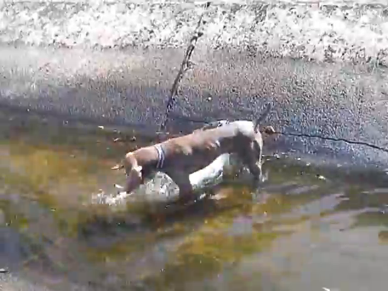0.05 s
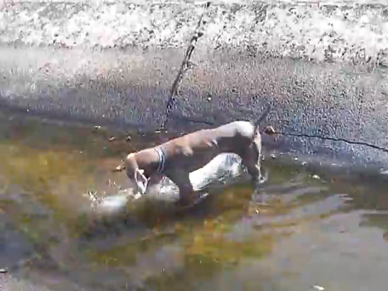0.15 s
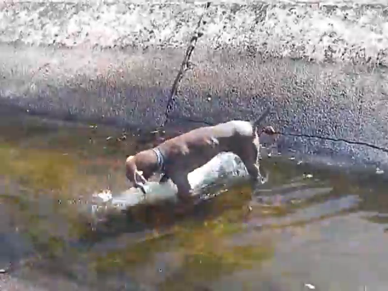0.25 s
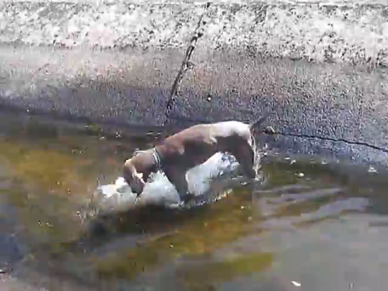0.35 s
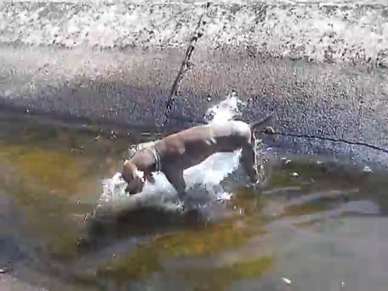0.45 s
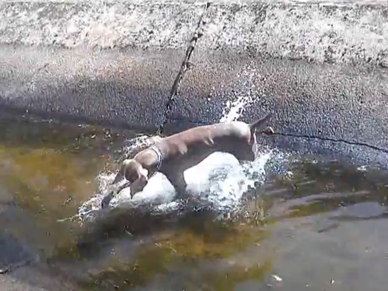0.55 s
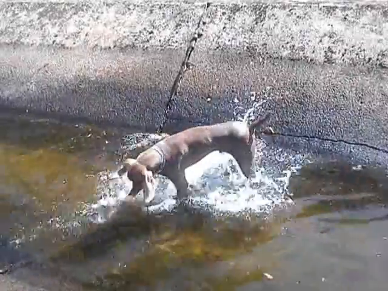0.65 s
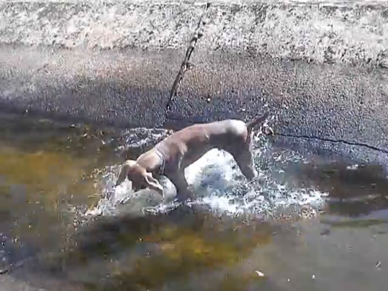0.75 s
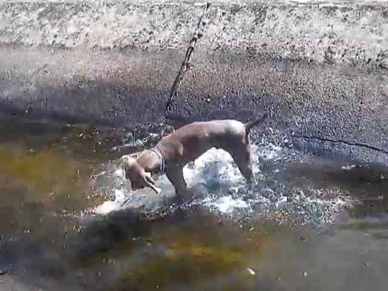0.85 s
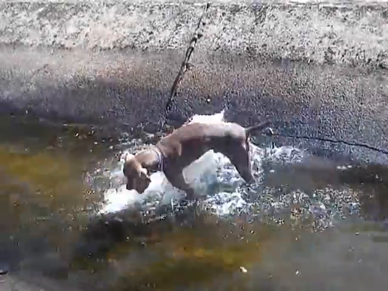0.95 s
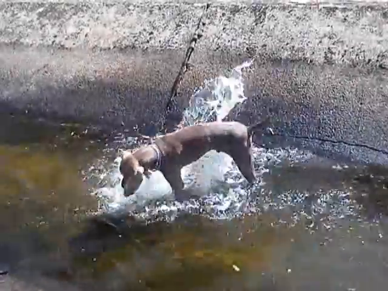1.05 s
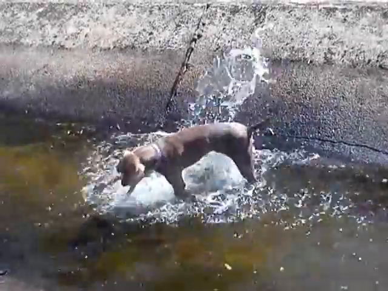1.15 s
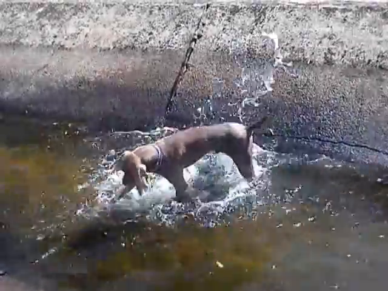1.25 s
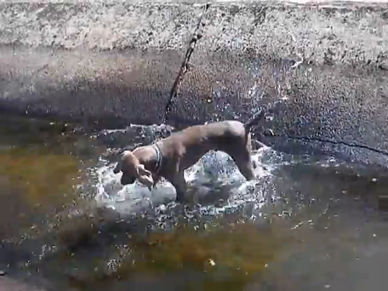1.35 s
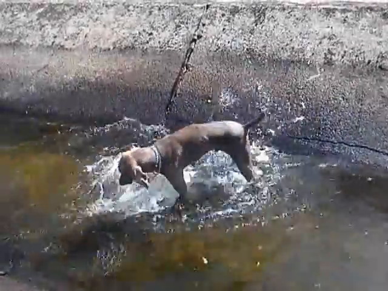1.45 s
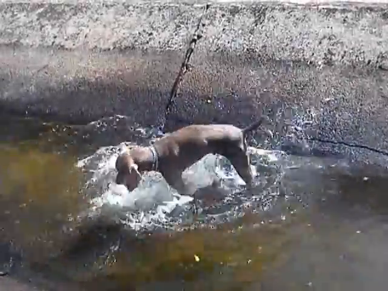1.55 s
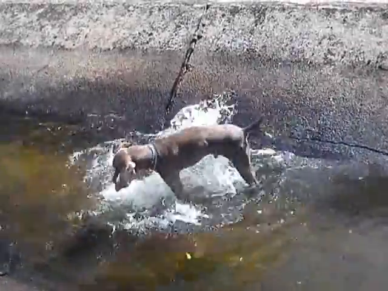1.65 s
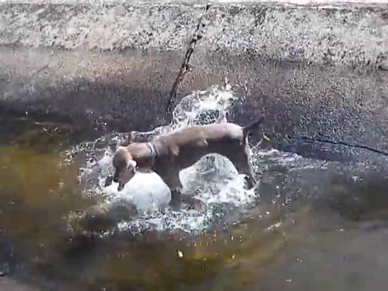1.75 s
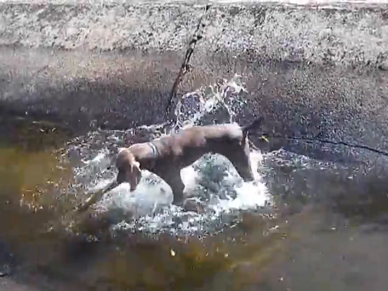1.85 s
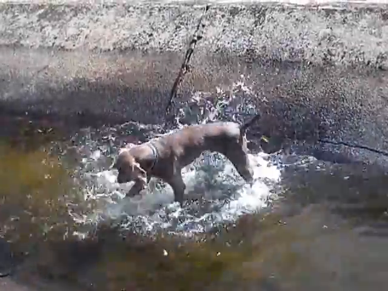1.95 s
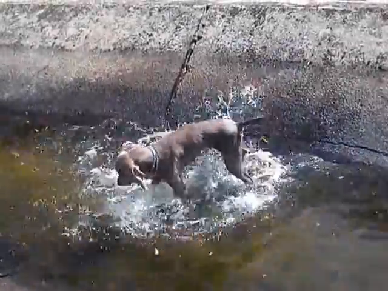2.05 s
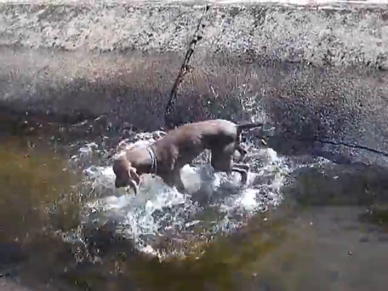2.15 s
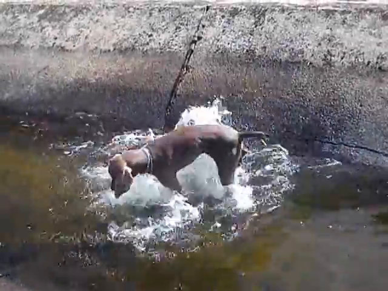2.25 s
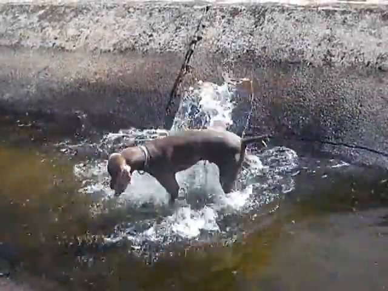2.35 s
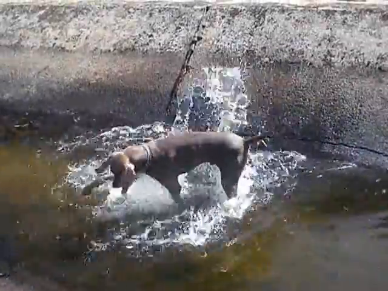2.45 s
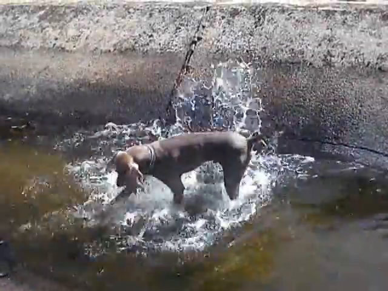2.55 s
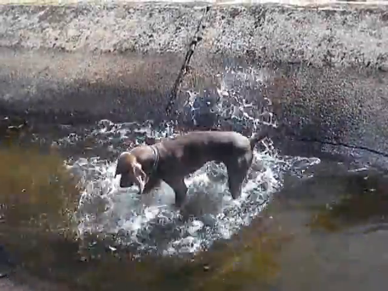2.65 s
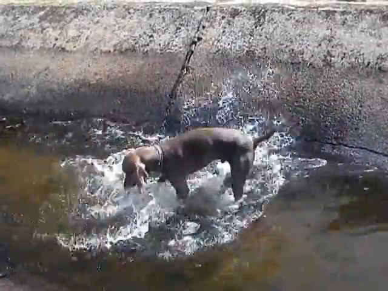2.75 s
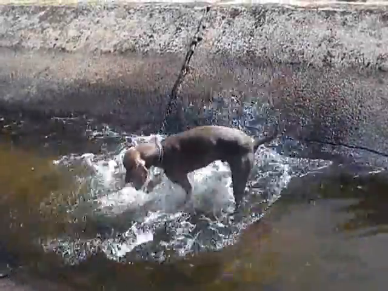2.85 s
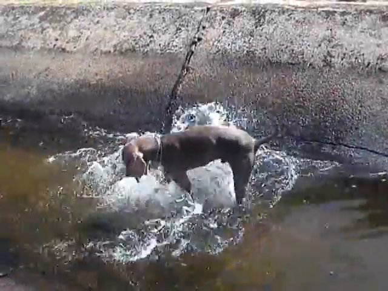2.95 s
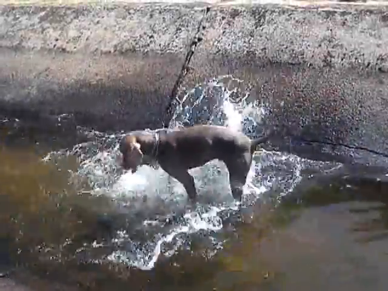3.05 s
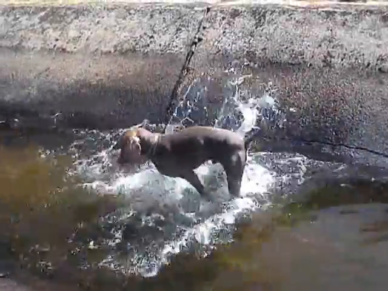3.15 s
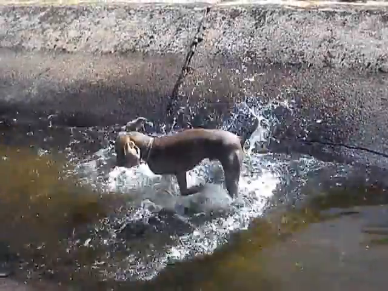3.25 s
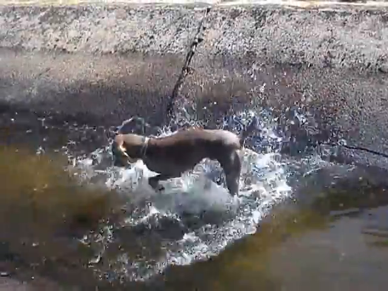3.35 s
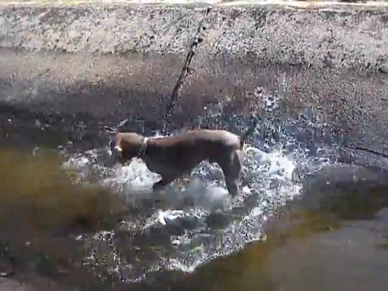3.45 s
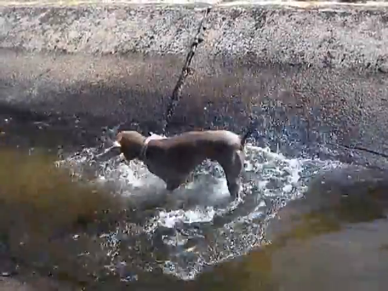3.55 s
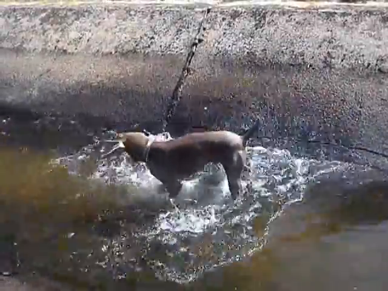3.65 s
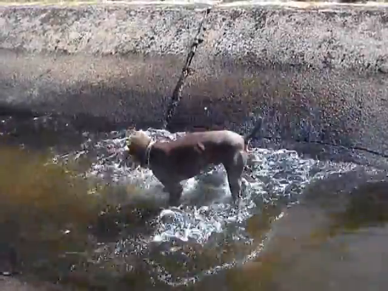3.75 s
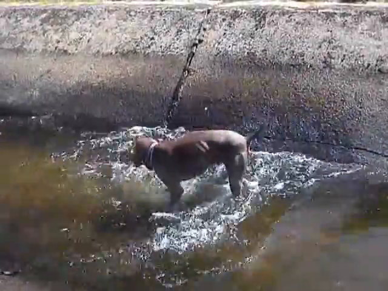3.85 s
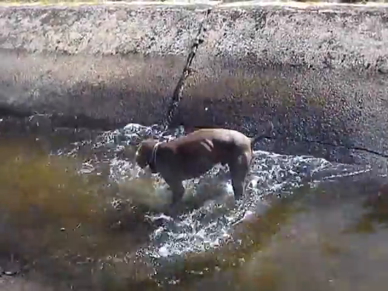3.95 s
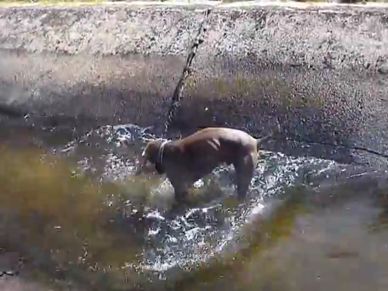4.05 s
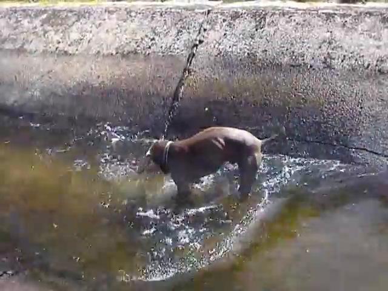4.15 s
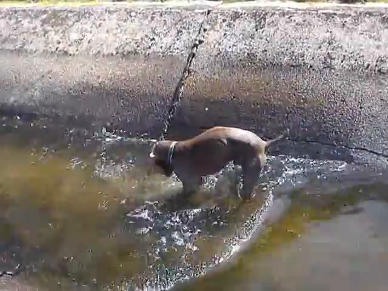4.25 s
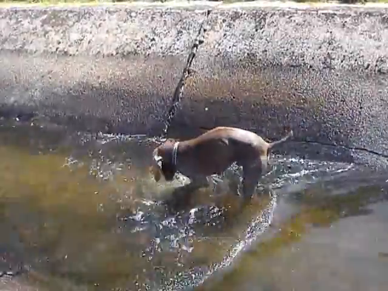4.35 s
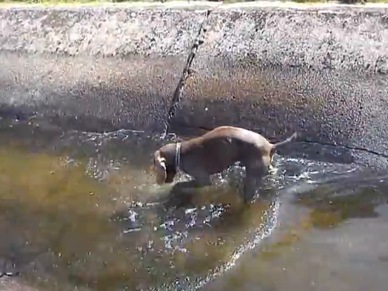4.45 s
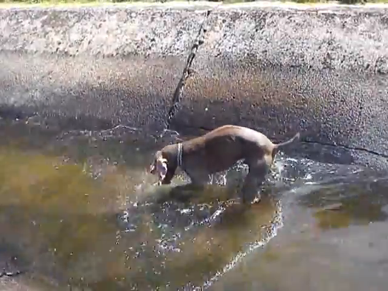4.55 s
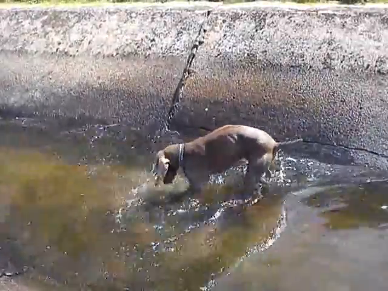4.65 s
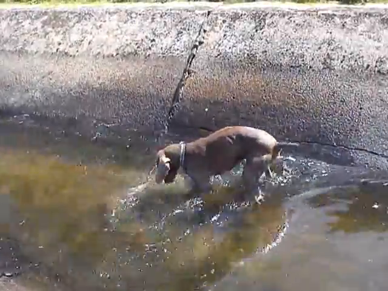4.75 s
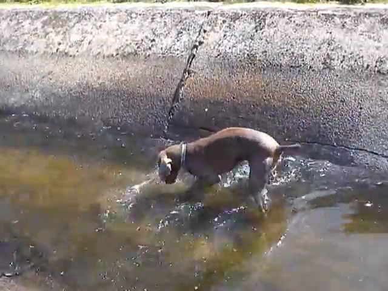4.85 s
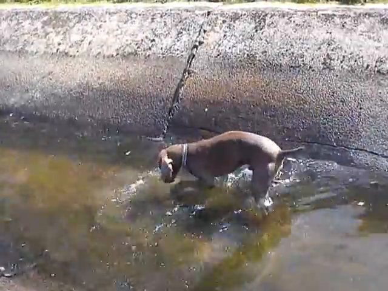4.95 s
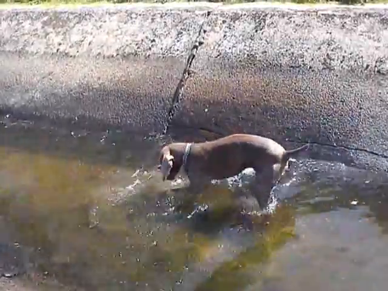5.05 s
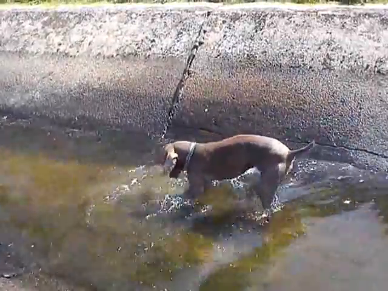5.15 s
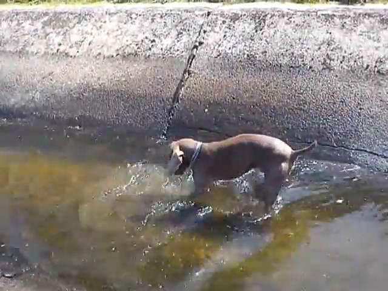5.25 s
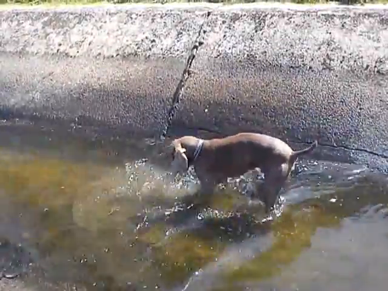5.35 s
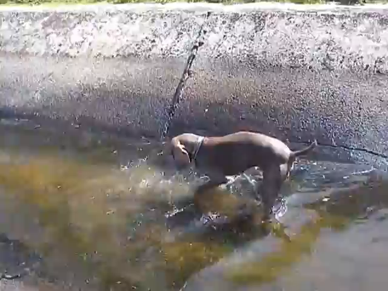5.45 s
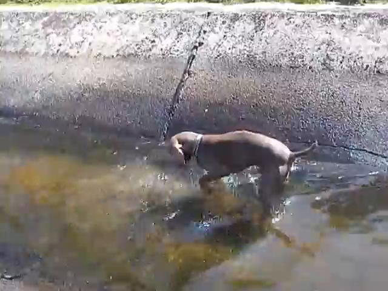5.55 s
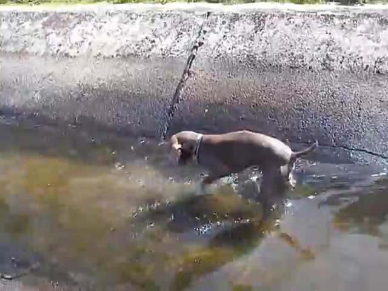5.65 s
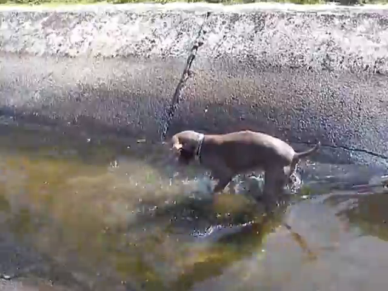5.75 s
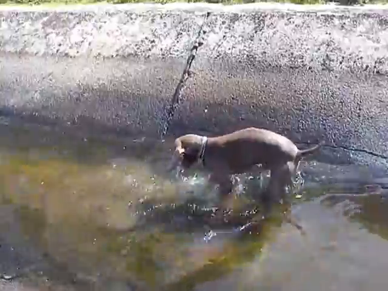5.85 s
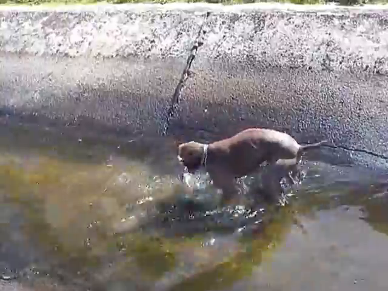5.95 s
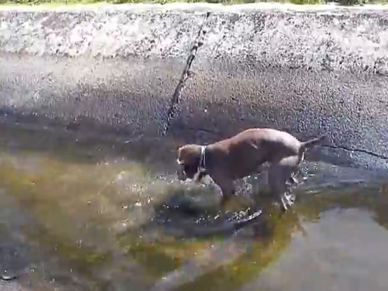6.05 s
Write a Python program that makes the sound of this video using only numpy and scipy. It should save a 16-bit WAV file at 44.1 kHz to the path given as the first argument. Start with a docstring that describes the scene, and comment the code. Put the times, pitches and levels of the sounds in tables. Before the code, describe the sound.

A light trickle and soft outdoor rush open the sound, until at about 0.2 s a sharp wet slap begins a dog's digging in shallow water. Until about 3.9 s, irregular strokes follow several times a second, each a burst of hissing, spattering spray over low bubbly churn. Hard slaps with short, bright bubble pops stand out, notably around 1.1, 1.7, 2.4, 2.7, 2.9, 3.1 and 3.6 s, while low air-pocket gulps glug among them. Falling drops fill the gaps. From 4 s it becomes much quieter: sparse drips, then wading sloshes from 4.2 s, a strong plop near 4.75 s, hollow gulps around 5.4 s, and busier splashes from 5.6 s to a final double gulp just after 6 s. Concrete banks add a weak, short echo. The mono microphone is narrow-band, with little above 5 kHz, squashing and clipping the loudest slaps.

```python
"""A dog digs with its forepaws in the shallow water of a concrete channel, then slows to a few wading steps.
Thrown water falls back as drop impacts and ringing bubbles, thinning into separate drips between strokes.
Legs churn larger bubbles into a low wash; slaps make spattering noise and strong bubbles; air pockets gulp.
The banks return a weak echo beside a steady outdoor rush.
The microphone is narrow-band, and its overload compresses and clips the sharpest slaps."""
import sys
import numpy as np
from scipy import signal
from scipy.fft import rfft, irfft
from scipy.io import wavfile
from scipy.ndimage import uniform_filter1d, minimum_filter1d

SR = 44100
rng = np.random.default_rng(int(sys.argv[2]) if len(sys.argv) > 2 else 0)


def persist_wave(psi):
    """Save psi, clipped to +-1, as 16-bit WAV."""
    counts = np.round(np.clip(psi, -1, 1) * 32767).astype(np.int16)
    wavfile.write(sys.argv[1], SR, np.atleast_2d(counts).T)


N = 269010
TIME = np.arange(N) / SR

# Paw strokes through the water, digging until 3.9 s and then wading:
# start_s, length_s, spray_level_db, churn_level_db (relative levels)
PAW_STROKES = [(0.241, 0.066, -18.5, -27.5), (0.349, 0.089, -14.5, -27.5), (0.537, 0.02, -21, -31.5),
               (0.615, 0.018, -13, -23), (0.765, 0.16, -14.5, -31), (0.994, 0.084, -17.5, -34),
               (1.205, 0.24, -15.5, -25), (1.639, 0.029, -10, -20.5), (1.698, 0.056, -16.5, -20),
               (1.828, 0.032, -14, -23.5), (1.884, 0.13, -13.5, -22.5), (2.065, 0.071, -16.5, -33.5),
               (2.337, 0.013, -18.5, -20), (2.466, 0.072, -22, -23), (2.583, 0.18, -16, -26.5),
               (2.83, 0.088, -17, -51), (2.985, 0.034, -15.5, -31.5), (3.144, 0.084, -14, -29.5),
               (3.234, 0.14, -15, -21.5), (3.433, 0.032, -17.5, -21.5), (3.515, 0.14, -13.5, -32.5),
               (3.724, .09, -22, -26), (4.207, 0.095, -26, -48.5), (4.595, 0.079, -24, -37),
               (4.702, 0.043, -21, -22.5), (4.912, 0.09, -28, -28.5), (5.068, 0.038, -27.5, -30.5),
               (5.317, .12, -23.5, -25.5), (5.556, 0.041, -24, -32), (5.638, 0.04, -21, -29),
               (5.746, 0.045, -21.5, -31.5), (5.817, 0.034, -18.5, -25), (5.916, 0.096, -19.5, -31.5),
               (6.01, 0.019, -32, -24)]
# Drops still coming down between strokes: time_s, level_db (relative)
LINGERING_FALL = [(0, -24), (.17, -24.5), (.33, -21), (.69, -20), (.98, -15.5), (1.8, -15.5), (2.05, -12),
                  (2.22, -15.5), (2.93, -16.5), (3.11, -20), (3.42, -13.5), (3.7, -21.5), (3.91, -22.5),
                  (4.09, -33), (4.55, -31), (4.88, -29), (5.0, -25), (5.25, -25), (5.52, -30), (6.1, -30.5)]
# Loudest hits of paws and lumps of water on the surface:
# start_s, level_db (relative), bubble_pitch_hz (at onset), spatter_db (added to level_db)
SURFACE_SLAPS = [(.2, 10, 2040, -17.5), (0.347, 2, 2236, -10.5), (0.378, -2, 1670, -22),
                 (.495, 4, 1920, -18), (0.626, -4, 2280, -15), (0.728, -2.5, 1910, -20.5),
                 (.805, -1.5, 2200, -13.5), (1.05, -1.5, 2056, -5.5), (1.079, 3, 3010, -12.5),
                 (1.13, 7, 2243, -12.5), (1.194, 0, 1480, -21), (1.215, -7, 1580, -9),
                 (1.253, -5, 1790, -6.5), (1.28, -0.5, 1890, -29), (1.473, -1.5, 1750, -17),
                 (1.59, -3, 2120, -7.5), (1.662, 0, 2800, -8), (1.693, 6, 2660, -10.5),
                 (1.714, 3.5, 1940, -18), (1.755, -2.5, 1700, -8), (1.823, -11, 1970, -10),
                 (1.893, 2, 2213, -10), (1.962, 3, 2310, -11.5), (2.343, -1.5, 1220, -23),
                 (2.364, 7, 2170, -14), (2.442, -3.5, 1455, -10), (2.491, 0.5, 2562, -12),
                 (2.6, 1, 1960, -33), (2.699, 7, 1956, -14), (2.86, 0, 3230, -22), (2.907, 7.5, 3060, -24),
                 (2.962, 0, 2350, -16), (3.143, 7.5, 2305, -10), (3.293, -3, 2420, -4),
                 (3.391, 0.5, 1550, -20), (3.605, 7, 3230, -23), (3.747, -8.5, 1207, -15),
                 (3.833, -3.5, 1880, -33), (3.905, -11, 2800, -7), (3.927, -4, 1600, -23),
                 (4.225, -7.5, 1680, -27), (4.306, -4.5, 2260, -34), (4.368, -12, 1200, -11.5),
                 (4.616, -5, 1227, -27), (4.739, -3, 1175, -19), (4.756, 8.5, 1840, -17),
                 (4.79, -13, 954, -12), (4.933, -4, 1340, -21.5), (4.964, -11.5, 835, -17),
                 (5.163, -14, 2200, -2.5), (5.286, -4, 1380, -14), (5.331, -8.5, 1174, -13),
                 (5.341, -6.5, 1510, -23), (5.366, -7, 1410, -7.5), (5.44, -11.5, 1055, -10),
                 (5.651, -8, 3340, -6.5), (5.665, -3.5, 2270, -19), (5.777, 3, 1413, -10),
                 (5.819, -5, 2330, -23), (5.844, 2.5, 2960, -31), (5.929, -5.5, 2200, -10),
                 (5.97, 0, 2720, -17)]
# Air pockets pulled under by a paw:
# start_s, level_db (peak), pitch_hz (at onset), glide_length_s, glide_octaves (over that length)
AIR_POCKETS = [(.33, -18.5, 111, 0.019, 0.15), (0.438, -9, 233, 0.039, -1.3),
               (0.635, -19, 327, 0.017, 0.28), (.745, -23.5, 169, 0.043, -0.69),
               (1.32, -20.5, 164, 0.019, -.3), (1.836, -18, 218, 0.017, -0.75),
               (1.964, -9.5, 217, 0.021, 0.23), (1.988, -20.5, 150, .05, -.5),
               (2.188, -22.5, 219, 0.066, 0.32), (1.661, -16.5, 623, .025, 0.24),
               (2.348, -12, 622, 0.021, 0.19), (2.5, -21.5, 215.5, 0.056, 0.99),
               (2.797, -21.5, 133, 0.016, 0.19), (2.984, -13.5, 659, 0.041, 0.39),
               (3.319, -7.5, 268, .012, .14), (3.517, -19.5, 217, 0.033, 0), (3.566, -16, 202, 0.095, 0.27),
               (3.611, -15.5, 224, 0.096, .04), (4.691, -22, 293, 0.044, 0.74),
               (4.722, -13, 879, 0.021, 0.5), (4.737, -15.5, 476, 0.027, 0.22),
               (4.837, -19.5, 189, 0.048, -0.31), (4.907, -22, 199, 0.016, -0.19),
               (5.057, -23, 255, .034, 0.0026), (5.365, -7.5, 191, 0.033, -.3),
               (5.409, -6.5, 170, 0.025, -0.53), (5.595, -24.5, 847, 0.042, -0.078),
               (5.752, -17.5, 315, 0.05, -0.2), (5.823, -22.5, 291, 0.028, -0.44),
               (6.029, -5.5, 205, 0.015, 0.81), (6.051, -7, 194, 0.034, -0.46)]
# Spectrum of dense falling water: frequency_hz, gain_db
SPRAY_SPECTRUM = [(300, -28), (850, -12.5), (1100, -4), (1500, 1), (2000, 1), (2500, 0.5), (3300, -4.5),
                  (4600, -3.5)]
# Spectrum of single drips: frequency_hz, gain_db
DRIP_SPECTRUM = [(800, -5), (1200, 1), (1600, 1), (2300, 2), (2800, -1), (3400, -7)]
# Spectrum of water stirred by the legs: frequency_hz, gain_db
CHURN_SPECTRUM = [(30, -16), (90, -7.5), (170, -8.5), (280, -0.5), (400, -1), (700, 0), (1000, -3.5),
                  (1800, -22)]
# Spectrum of the outdoor background: frequency_hz, gain_db
AIR_SPECTRUM = [(25, -17), (70, -11), (120, -1), (180, 0.5), (260, -3.5), (400, -23), (1200, -12),
                (2400, -8.5), (3300, -9.5), (4600, -8.5), (7000, -26.5)]
# Microphone response: frequency_hz, gain_db
MIC_RESPONSE = [(20, -7), (70, 4.5), (2350, 0), (2600, -3), (3000, -2.5), (3300, 3.5), (3480, 0.5),
                (3950, -14.5), (4150, -15.5), (4600, -14), (4750, -20), (5000, -32), (5300, -106)]
# Spectra of the remaining noises: frequency_hz, gain_db
IMPACT_SPECTRUM = [(300, -16.5), (900, 0.0), (5000, -5.5), (8000, -33)]
SLOSH_SPECTRUM = [(400, -13.0), (1000, -2.0), (3500, -1.0), (6000, -15.5)]
SPATTER_SPECTRUM = [(150, -4.5), (600, -4.5), (1300, 11), (2200, 12.5), (3300, 12.5), (4600, 3.5), (8000, -12.0)]
BOIL_SPECTRUM = [(40, -10.0), (110, 1.5), (300, -1.5), (500, -10.0), (1200, -25.5), (3000, -48.5)]

PUSH_S, SAG_DB_PER_S = 0.0085, 9.5  # a stroke builds up this fast, then slowly loses force
SPRAY_FALL_S, CHURN_FALL_S = 0.036, 0.032  # amplitude decay times once the paw is out
WASH_DB, WASH_FOLLOW = -23.5, 0.52  # relative wash level at 0 dB of lingering fall, and dB gained per dB of it
# Drops from a slap: level against it, lag of their peak, spread in time
SPLINTER_DB, SPLINTER_LAG_S, SPLINTER_S = -22.5, 0.0025, 0.0066
EDGE_HZ = 15900  # final band limit


def gain_of(db):
    """Amplitude ratio from decibels: 20 dB is a factor of ten."""
    return 10 ** (np.asarray(db) / 20)


def evened(x):
    """Normalization to unit root-mean-square amplitude."""
    return x / np.sqrt(np.mean(x ** 2) + 1e-20)


def read(points, hz):
    """Interpolation of a spectrum along logarithmic frequency."""
    frequency_hz, value = np.transpose(points)
    return np.interp(np.log(hz + 1), np.log(frequency_hz + 1), value)


def add(mix, s, sound):
    """Superposition: a sound is summed into the mix from time s, in seconds."""
    part = mix[max(round(s * SR), 0):][:len(sound)]
    part += sound[:len(part)]


def colour(x, points, size=4096):
    """Minimum-phase filtering: a causal response has the given spectrum, so attacks stay sharp."""
    log_gain = np.log(gain_of(read(points, abs(np.fft.fftfreq(size, 1 / SR)))))
    response = np.exp(np.conj(signal.hilbert(log_gain)))
    taps = np.fft.ifft(response).real
    return signal.oaconvolve(x, taps[:size // 2])[:N]


def wander(hz):
    """Low-passed Gaussian noise of unit size fluctuates smoothly at rates up to about hz."""
    f = np.fft.rfftfreq(N, 1 / SR)
    spectrum = rfft(rng.standard_normal(N)) * np.exp(-(f / hz) ** 2)
    return evened(irfft(spectrum, N))


def bubble(hz, cycles, rise):
    """Damped resonance: a bubble decays over some cycles, its pitch climbing as it nears the surface."""
    age = np.arange(int(5 * cycles / hz * SR)) * hz / SR / cycles  # in decay times
    envelope = (1 - np.exp(-age * cycles * 2)) * np.exp(-age)
    turns = cycles * (age + rise * age ** 2 / 2)
    return envelope * np.sin(2 * np.pi * turns)


def bubbles(low_hz, high_hz, per_s, spread_db, cycles, rise, count=48):
    """Random superposition of bubbles of many pitches: most are faint, a few are strong."""
    out = np.zeros(N)
    for step in range(count):
        own = np.random.default_rng(rng.integers(2 ** 31))
        hz = low_hz * (high_hz / low_hz) ** ((step + own.random()) / count)
        ring = bubble(hz, cycles * 2 ** own.uniform(-1, 1), rise)
        at, chance = own.random((int(per_s * N / SR / count), 2)).T
        size = gain_of(spread_db * np.minimum(-np.log(1 - chance), 3.5))
        births = np.bincount((at * N).astype(int), size, N)
        # ring energy proportional to pitch balances the swarm
        out += signal.oaconvolve(births, ring * np.sqrt(hz / np.sum(ring ** 2)))[:N]
    return evened(out)


def stroke_shape(start, length, fall_s):
    """Forcing and relaxation: the paw pushes in, drags while losing force, and leaves the water to settle."""
    age = np.maximum(TIME - start, 0)
    push = np.sin(np.pi / 2 * np.minimum(age / PUSH_S, 1)) ** 2
    settling = np.exp(-np.minimum(np.maximum(age - length, 0) / fall_s, 20))
    return push * gain_of(-SAG_DB_PER_S * age) * settling


def thrown_db():
    """Power addition: strokes and slaps throw more water on top of what is still coming down."""
    power = np.zeros(N)
    for start, length, db, _ in PAW_STROKES:
        power += (gain_of(db) * stroke_shape(start, length, SPRAY_FALL_S)) ** 2
    burst_time = np.arange(-3 * SPLINTER_S, 3 * SPLINTER_S, 1 / SR)
    burst = np.exp(-(burst_time / SPLINTER_S) ** 2)
    for s, db, _, _ in SURFACE_SLAPS:
        start = s + SPLINTER_LAG_S - len(burst) / 2 / SR
        add(power, start, gain_of(db + SPLINTER_DB) ** 2 * burst)
    lingering_db = np.interp(TIME, *np.transpose(LINGERING_FALL))
    return 10 * np.log10(power + gain_of(lingering_db) ** 2)


def clumped(x, patch_db=0.5, size=512):
    """Time-varying filtering: falling water favours different frequency ranges from moment to moment."""
    overlap = size * 3 // 4
    spectra = signal.stft(x, nperseg=size, noverlap=overlap)[2]
    patches = rng.standard_normal(spectra.shape)
    for axis in (0, 1):
        patches = uniform_filter1d(patches, size=8, axis=axis)
    shaped = spectra * gain_of(patch_db * evened(patches))
    return signal.istft(shaped, nperseg=size, noverlap=overlap)[1][:N]


def spray(drops_per_s=4200, fizz_db=-3, clump_db=1.71):
    """Impact and resonance: thrown water lands in clumps, its drops fizz, and trapped bubbles ring."""
    ringing = bubbles(644.2, 5000, drops_per_s, spread_db=4.5, cycles=3.3, rise=0.031, count=72)
    impacts = rng.standard_normal(N) * gain_of(1.4 * wander(470))
    impacts = evened(colour(impacts, IMPACT_SPECTRUM))
    water = clumped(colour(ringing + gain_of(fizz_db) * impacts, SPRAY_SPECTRUM))
    return evened(water * gain_of(clump_db * wander(48)))


def trickle(drips_per_s=900, plinks_per_s=45, plink_db=-10, slosh_db=-5):
    """Bubble resonance over a soft slosh: a few drips trap bubbles that ring longer and chirp upward."""
    drips = bubbles(906.6, 3500, drips_per_s, spread_db=6.5, cycles=6.6, rise=0.032, count=26)
    plinks = bubbles(800, 2600, plinks_per_s, spread_db=3, cycles=25, rise=0.055, count=18)
    slosh = evened(colour(rng.standard_normal(N), SLOSH_SPECTRUM))
    water = drips + gain_of(plink_db) * plinks + gain_of(slosh_db) * slosh
    return evened(colour(water, DRIP_SPECTRUM))


def lumps(per_s=20, least_db=3.5, range_db=4, low_hz=1100, high_hz=3200, spatter_db=-10,
          spatter_s=0.00099, size=768):
    """Random impacts: small lumps of water land among the drops, each with a spatter and one bubble."""
    rings, bursts = np.zeros(N), np.zeros(N)
    age = np.arange(size) / SR / spatter_s
    spatter = evened(colour(rng.standard_normal(N), SPRAY_SPECTRUM))
    for when, pitch, weight in rng.random((int(per_s * N / SR), 3)):
        start = when * N / SR
        gain = gain_of(least_db + range_db * weight)
        hz = low_hz * (high_hz / low_hz) ** pitch
        add(rings, start, gain * bubble(hz, cycles=7, rise=.02))
        add(bursts, start, gain * age * np.exp(1 - age))
    return rings + gain_of(spatter_db) * bursts * spatter


def falling_water(thin_db=-22, blend_db=3, surge_db=0.78):
    """Power crossfade: much water merges into a surging spray; as it thins out, separate drips remain."""
    db = thrown_db()
    dense = 1 / (1 + np.exp((thin_db - db) / blend_db))
    water = np.sqrt(dense) * spray() + np.sqrt(1 - dense) * trickle() + lumps()
    return gain_of(db + surge_db * wander(13)) * water


def stirred_db():
    """Power addition: each stroke swells the churn over a wash that grows with the lingering fall."""
    power = np.zeros(N)
    for start, length, _, db in PAW_STROKES:
        power += (gain_of(db) * stroke_shape(start, length, CHURN_FALL_S)) ** 2
    lingering_db = np.interp(TIME, *np.transpose(LINGERING_FALL))
    return 10 * np.log10(power + gain_of(WASH_DB + WASH_FOLLOW * lingering_db) ** 2)


def churn(level_db=-1, foam_db=-3):
    """Bubble resonance and turbulence: the legs stir up larger bubbles and a low wash."""
    ringing = bubbles(133.7, 1148, 420, spread_db=4, cycles=3.1, rise=0.029, count=26)
    ringing = evened(colour(ringing, CHURN_SPECTRUM))
    wash = evened(colour(rng.standard_normal(N), CHURN_SPECTRUM))
    water = evened(ringing + gain_of(foam_db) * wash)
    return water * gain_of(stirred_db() + level_db)


def air(level_db=-35):
    """Filtered random noise: a steady outdoor rush with a soft low rumble."""
    return gain_of(level_db) * evened(colour(rng.standard_normal(N), AIR_SPECTRUM))


def slaps(ring_db=-.5, spatter_s=0.0015, pinch_s=0.00097, size=2048):
    """Impact and resonance: a slap throws a spatter of a few milliseconds and pinches off one bubble."""
    rings, spatters = np.zeros(N), np.zeros(N)
    age = np.arange(size) / SR / spatter_s
    for s, db, hz, spatter_db in SURFACE_SLAPS:
        ring = bubble(hz, cycles=7, rise=0.022)
        pinch = 1 - np.exp(-np.arange(len(ring)) / SR / pinch_s)
        spatter = rng.standard_normal(size) * age * np.exp(1 - age)
        add(spatters, s, gain_of(db + spatter_db) * spatter)
        add(rings, s, gain_of(db + ring_db) * pinch * ring)
    return rings + colour(spatters, SPATTER_SPECTRUM)


def gulps(swell=0.26, turbulence_db=-18):
    """Large-cavity resonance: an air pocket swells, glides in pitch and dies while the water around it boils."""
    rings, envelope = np.zeros(N), np.zeros(N)
    for s, db, hz, length, glide in AIR_POCKETS:
        age = np.arange(int(2 * length * SR)) / SR / length  # in glide lengths
        turns = np.cumsum(hz * 2 ** (glide * np.minimum(age, 1))) / SR
        shape = gain_of(db) * (age / swell * np.exp(1 - age / swell)) ** 2
        add(rings, s, shape * np.sin(2 * np.pi * turns))
        add(envelope, s, shape)
    boil = evened(colour(rng.standard_normal(N), BOIL_SPECTRUM))
    return rings + gain_of(turbulence_db) * envelope * boil


def bank(x, echo_db=-17, t60_s=.16, size=11025):
    """Diffuse reflection: the sloping concrete sides scatter a short, weak echo."""
    t = np.arange(size) / SR
    sparse = rng.standard_normal(size) * (rng.random(size) < .03)
    taps = sparse * (t > .005) * gain_of(-60 * t / t60_s)
    echo = signal.oaconvolve(x, taps / np.linalg.norm(taps))[:N]
    return x + gain_of(echo_db) * echo


def scene():
    """Superposition of all the water sounds between the banks, over the background."""
    water = falling_water() + churn() + slaps() + gulps()
    return (bank(water) + air())[None]


def record(dry, knee=.85, ratio=2.5):
    """Band limitation and overload: a fast compressor rides the peaks, and the hardest slaps still clip."""
    x = colour(dry[0], MIC_RESPONSE)
    gain = (knee / np.maximum(abs(x), knee)) ** (1 - 1 / ratio)
    gain = minimum_filter1d(gain, size=89)  # hold about 1 ms either side of a peak
    gain = uniform_filter1d(uniform_filter1d(gain, size=45), size=45)
    loud = np.clip(x * gain, -1, 1)
    low_pass = signal.firwin(511, EDGE_HZ, window=("kaiser", 9), fs=SR)
    return signal.oaconvolve(loud, low_pass, "same")[None]


dry = scene()
out = record(dry)
persist_wave(out)
```